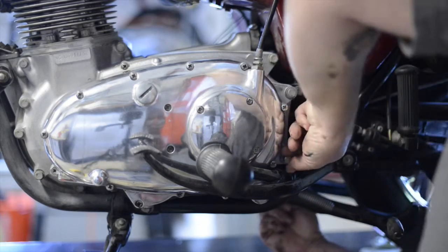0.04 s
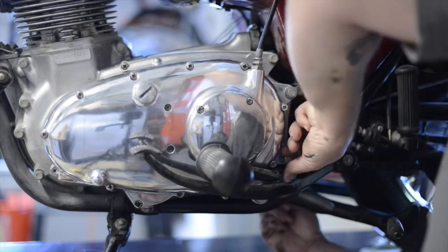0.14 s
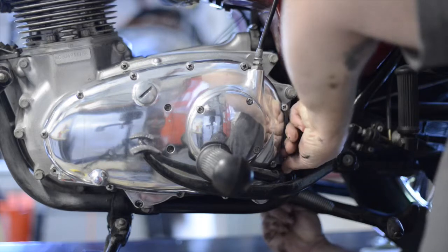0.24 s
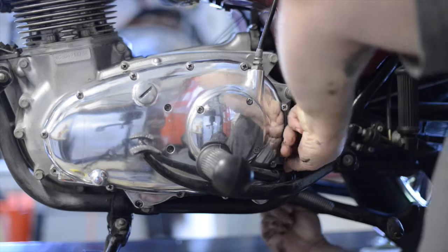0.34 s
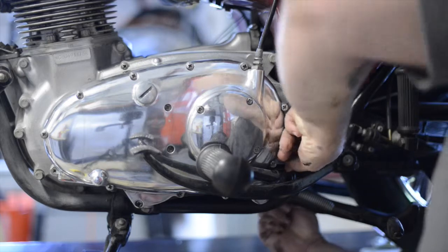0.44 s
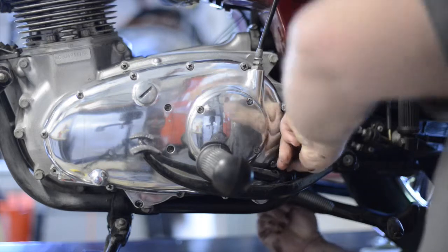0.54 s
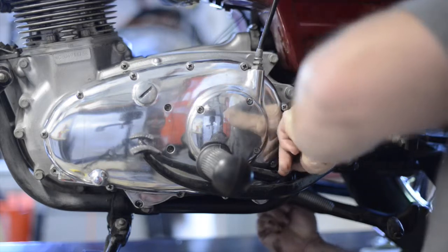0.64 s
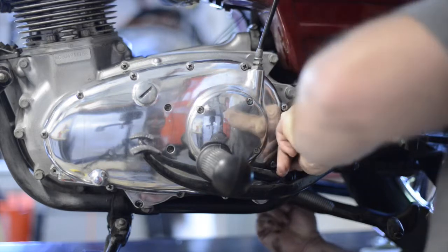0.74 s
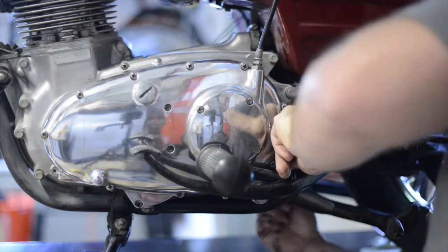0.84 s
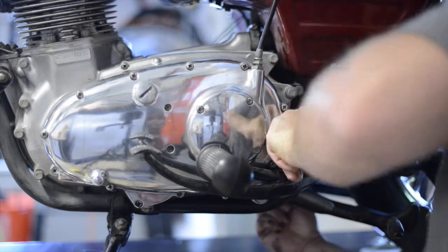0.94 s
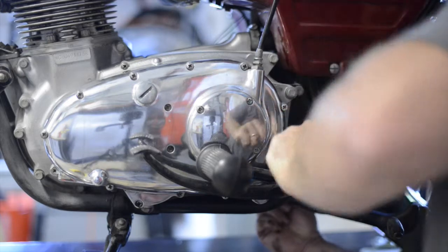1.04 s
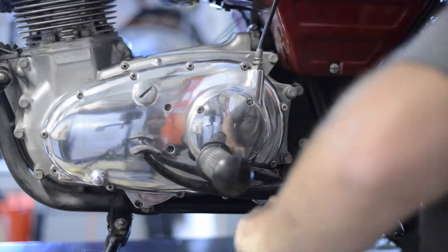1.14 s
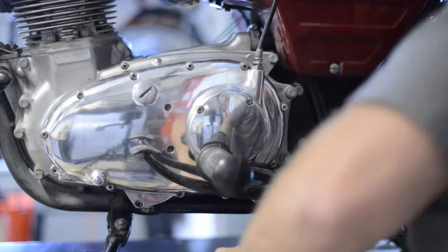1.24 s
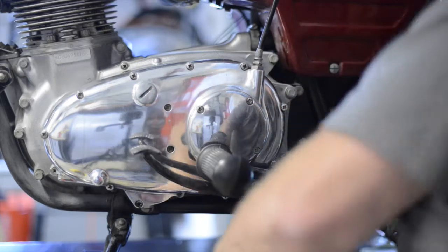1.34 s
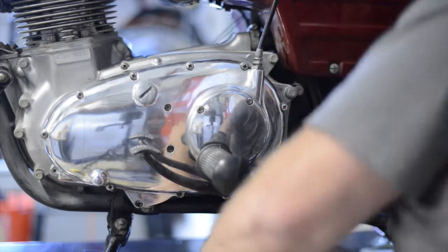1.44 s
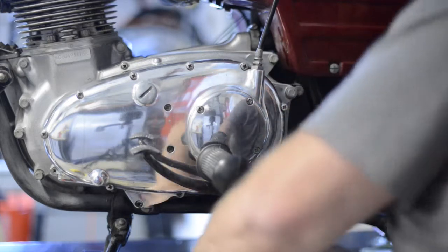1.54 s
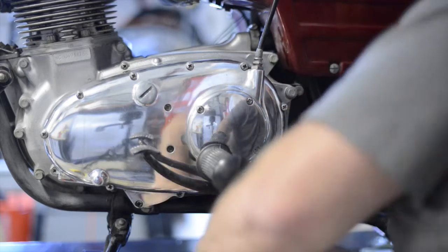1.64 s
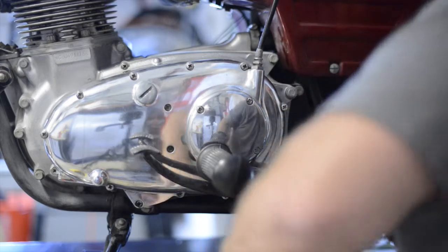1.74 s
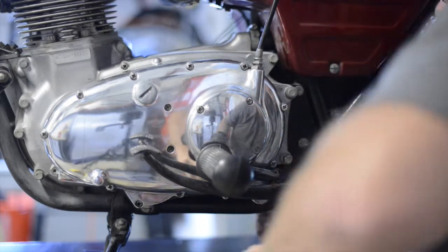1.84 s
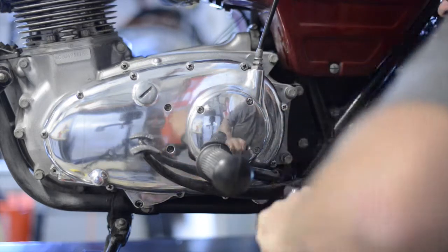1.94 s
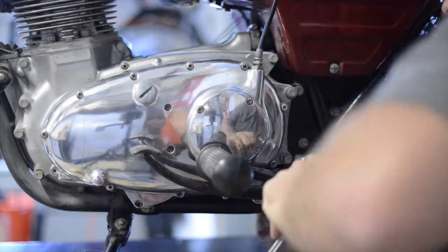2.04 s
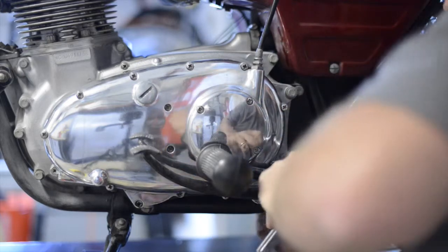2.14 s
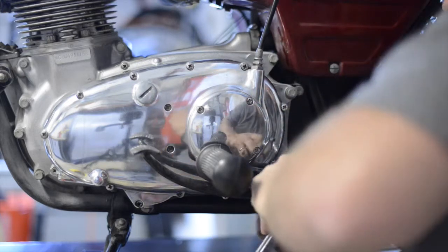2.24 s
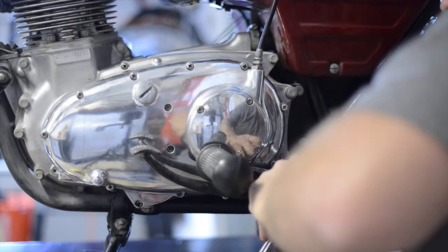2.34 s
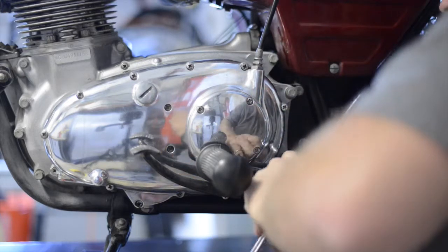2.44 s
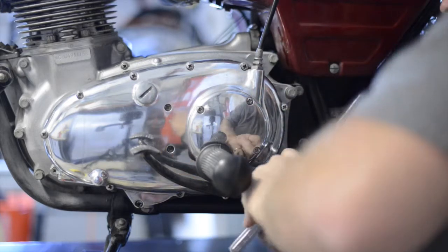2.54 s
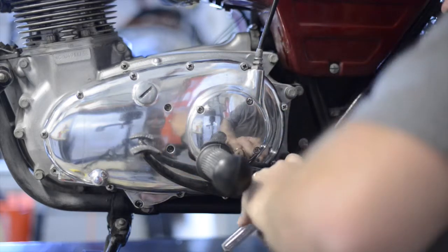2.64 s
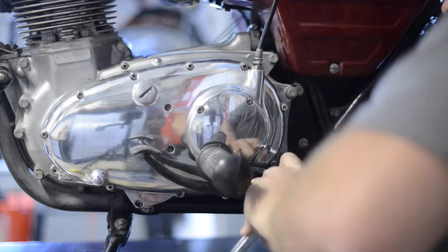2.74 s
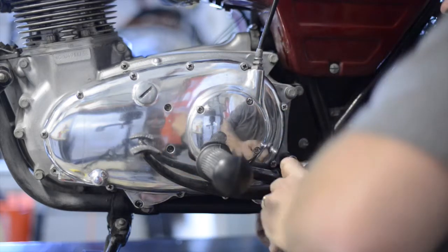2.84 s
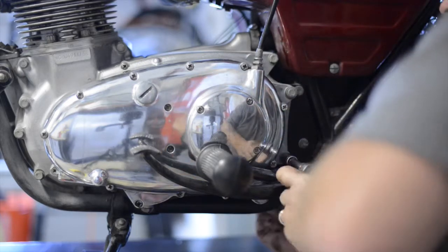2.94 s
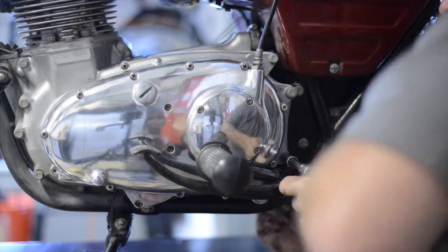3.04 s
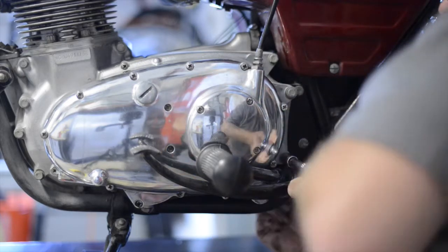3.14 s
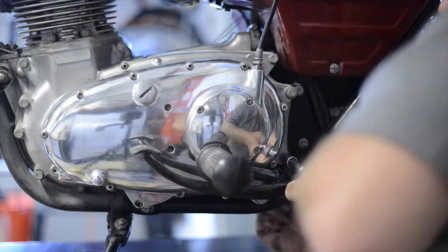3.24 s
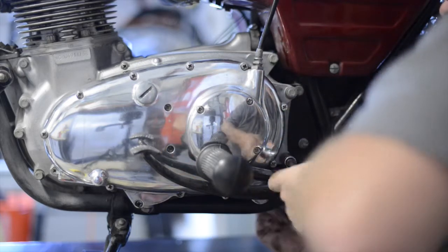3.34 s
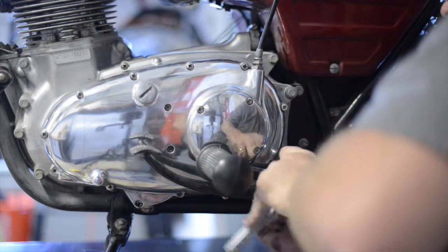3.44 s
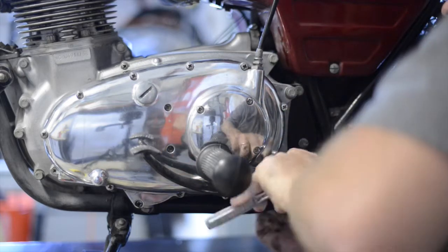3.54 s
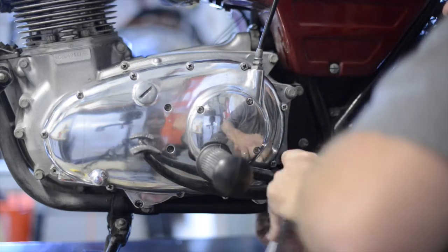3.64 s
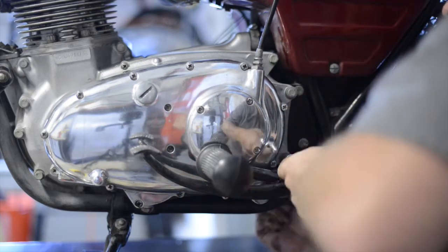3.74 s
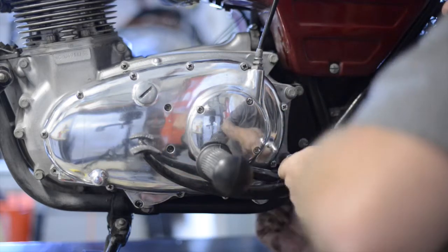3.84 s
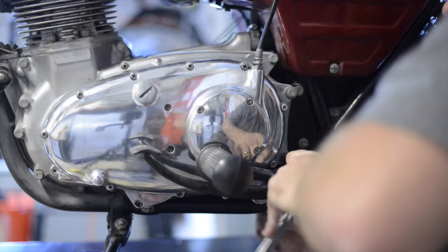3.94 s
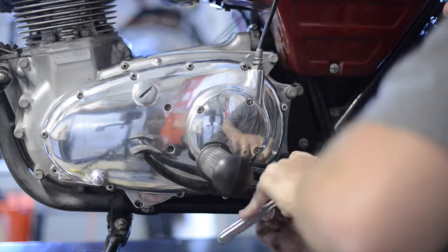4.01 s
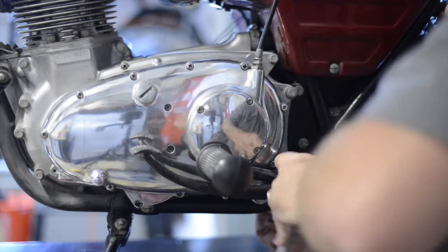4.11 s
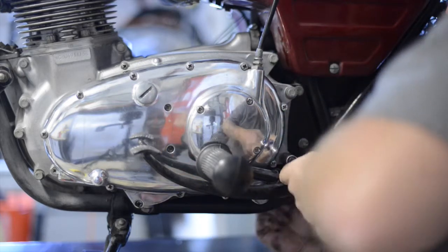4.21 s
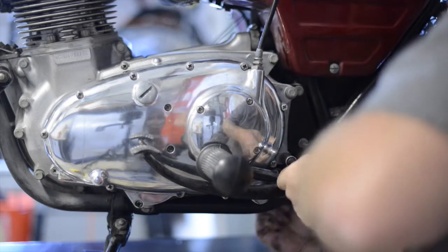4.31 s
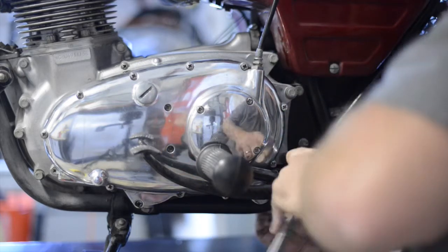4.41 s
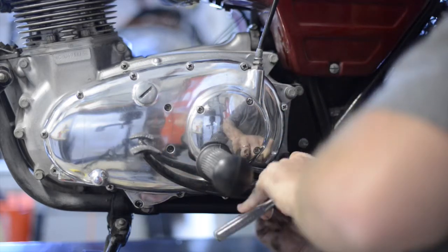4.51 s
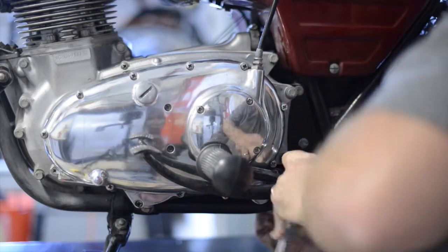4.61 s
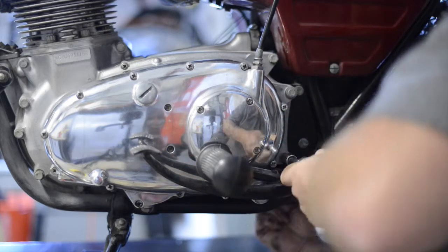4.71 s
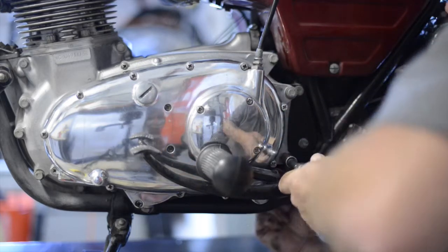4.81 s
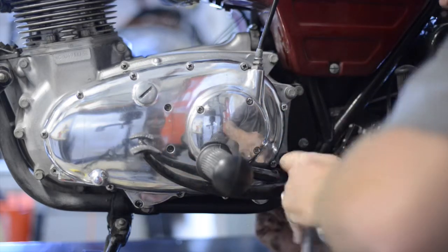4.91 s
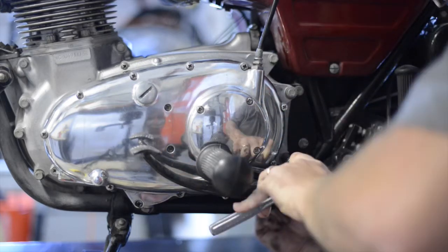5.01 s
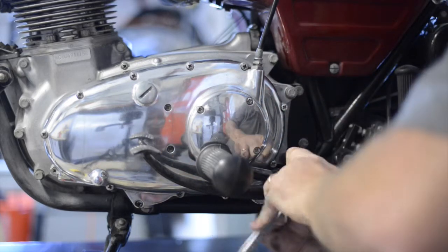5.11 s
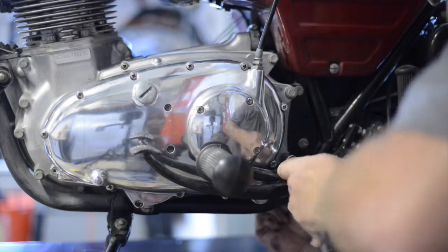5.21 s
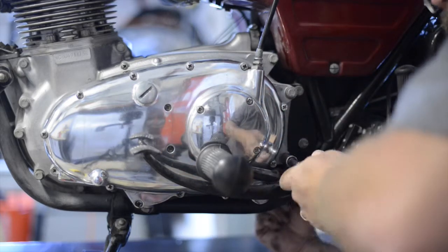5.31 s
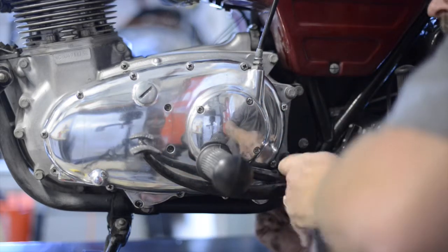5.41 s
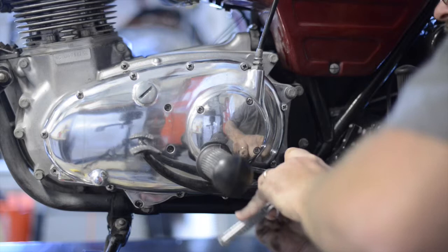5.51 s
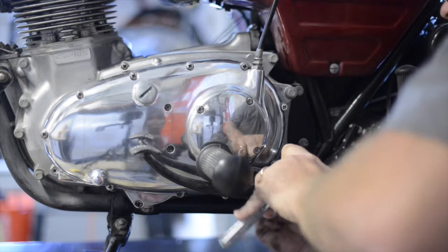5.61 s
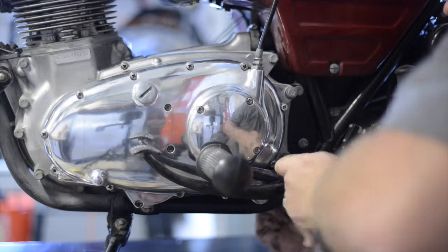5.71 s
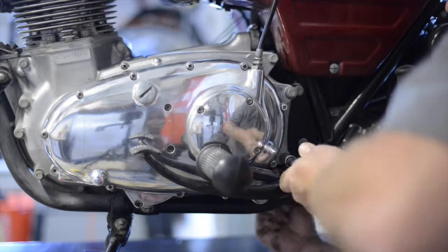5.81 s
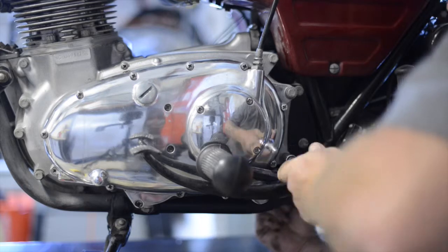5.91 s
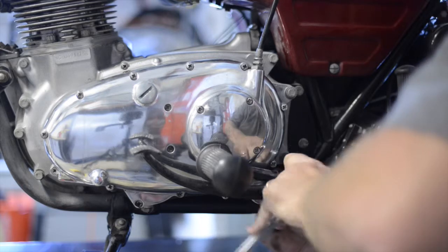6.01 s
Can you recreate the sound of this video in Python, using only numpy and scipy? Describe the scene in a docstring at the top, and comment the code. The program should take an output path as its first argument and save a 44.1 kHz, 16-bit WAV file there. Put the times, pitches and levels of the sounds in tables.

```python
"""A ratchet swings back six times on a motorcycle nut, its pawl snapping over the teeth, close to the microphone.
Place: a hard-walled workshop with a steel lift; ventilation air and a faint motor hum lie behind.
Before that a spanner hisses and squeals off the nut as rubbed noise and a sliding tone, and clangs down on the lift;
a socket is fitted and the nut gives with a clunk. Contacts are bursts of tiny impacts through the spectrum
of the part they shake; struck metal rings in dying sines. Noise echoes carry the tools around the room."""
import sys
import numpy as np
from scipy import signal
from scipy.fft import rfft, irfft
from scipy.io import wavfile

SR = 44100
rng = np.random.default_rng(int(sys.argv[2]) if len(sys.argv) > 2 else 0)


def materialize(psi):
    """Save the field psi as 16-bit PCM at rate SR to the path in sys.argv[1].

    A 1-D psi becomes a single channel; in a 2-D psi each row is a channel.
    """
    bounded = np.clip(np.atleast_2d(psi).T, -1, 1)
    quanta = np.round(bounded * 32767).astype(np.int16)
    wavfile.write(sys.argv[1], SR, quanta)


N = 267246
TIME = np.arange(N) / SR   # s


def amp(db):
    """Decibels to gain."""
    return np.exp(np.asarray(db) * (np.log(10) / 20))


def rms_one(x):
    """Scale to unit rms."""
    return x / np.sqrt(np.mean(x ** 2) + 1e-20)


def at_hz(points, hz):
    """Read a table on a log-frequency axis."""
    freqs, values = np.transpose(points)
    return np.interp(np.log(np.maximum(hz, 1)), np.log(freqs), values)


def in_time(rows):
    """Join the rows of a curve by straight lines."""
    s, *columns = np.transpose(rows)
    return [np.interp(TIME, s, column) for column in columns]


def add(out, s, sound):
    """Mix a sound in at time s."""
    start = max(round(s * SR), 0)
    out[start:start + len(sound)] += sound[:max(N - start, 0)]


def through(x, response):
    """Convolve, keeping the length."""
    return signal.fftconvolve(x, response)[:len(x)]


def colour(x, spectrum, tilt_db=0, size=2048):
    """Causal (minimum-phase) filter of this spectral shape, tilted per octave above the bass; keeps white-noise power."""
    hz = np.fft.rfftfreq(size, 1 / SR)
    octaves = np.log2(np.maximum(hz, 170))
    gain = rms_one(amp(at_hz(spectrum, hz) + tilt_db * octaves))
    # folding the cepstrum onto positive times makes the filter causal
    cepstrum = irfft(np.log(gain))
    cepstrum[1:size // 2] *= 2
    cepstrum[size // 2 + 1:] = 0
    return through(x, irfft(np.exp(rfft(cepstrum))))


def drift(rate):
    """Slow chance of unit rms, with this many random knots per second."""
    knots = rng.standard_normal(int(rate * N / SR) + 2)
    return rms_one(np.interp(TIME * rate, np.arange(len(knots)), knots))


def burst(dying_s, grain_db=0, size=SR // 3):
    """One contact: a dying crowd of tiny impacts, uneven in size where grain_db asks for it."""
    impacts, sizes = rng.standard_normal((2, size))
    fade = np.exp(-TIME[:size] / max(dying_s, 1e-4))
    # the energy depends on the fade alone, not on chance
    return rms_one(impacts * amp(grain_db * sizes) * fade) * np.sqrt(np.mean(fade ** 2))


def ring(modes, uneven_db=0, seconds=1):
    """Struck modes die as sines, with a random sign at every blow and uneven strength where uneven_db asks for it."""
    t = TIME[:int(seconds * SR)]
    chance = rng.standard_normal((len(modes), 2))
    out = np.zeros(len(t))
    for (hz, db, t60), (size, sign) in zip(modes, chance):
        fade = amp(db + uneven_db * size - 60 * t / t60)
        out += np.sign(sign) * fade * np.sin(2 * np.pi * hz * t)
    return out


# spectral shape of the ventilation air: f/Hz, relative level/dB
AIR = [(15, -50), (25, -21.5), (117, -3.5), (149, -12.5), (185, -11.5), (344, -13), (516, -18),
       (591, -15.5), (796, -17), (887, -20), (1020, -19.5), (3720, -25), (8360, -28.5), (16000, -37.5)]
# steady ventilation air, with the dying reverberation of an earlier sound at the start: t/s, level/dB
AIR_LEVEL = [(0, -48.5), (0.6, -51.5), (6.06, -53)]
# partials of the motor hum: f/Hz, relative level/dB
HUM = [(119.6, 2), (77, -5.5)]
# course of the motor hum, before its trim: t/s, level/dB
HUM_LEVEL = [(0.0, -51.5), (0.54, -62.5), (0.84, -53), (1.45, -51.5), (2.34, -68), (6.06, -57.5)]


def background(waver_hz=2.46, motor_db=-1.0):
    """Ventilation air as coloured noise, and a motor hum of sines that waver in pitch."""
    (air_db,), (hum_db,) = in_time(AIR_LEVEL), in_time(HUM_LEVEL)
    air = colour(rng.standard_normal(N), AIR, size=8192)
    hum = np.zeros(N)
    for hz, db in HUM:
        hum += amp(db) * np.sin(2 * np.pi * np.cumsum(hz + waver_hz * drift(8.8)) / SR)
    return amp(air_db) * air + amp(hum_db + motor_db) * rms_one(hum)


# the hand bumps the frame: t/s, level/dB, thud hardness/(dB per octave), dying time/s
BUMPS = [(0.003, -38, 1.5, 0.012), (0.241, -40, -1, 0.0033)]


def hand_contacts(thud_db=-1, clank_db=-16, tick_db=-11):
    """A hand is soft: nearly all thud, little clank or tick."""
    return [(s, db + thud_db, hardness_db, db + clank_db, db + tick_db, dying_s)
            for s, db, hardness_db, dying_s in BUMPS]


# low swaying modes of the frame: f/Hz, relative level/dB, t60/s
SWAY = [(186.5, 4, 0.14), (244, -0.5, 0.08), (380.6, -2, 0.12), (544, -3.5, 0.099)]


def bumps():
    """Soft blows set the frame's low modes swaying."""
    out = np.zeros(N)
    for s, db, *_ in BUMPS:
        add(out, s, amp(db) * ring(SWAY, seconds=.3))
    return out


# tools knock against the machine:
# t/s, frame thud level/dB, thud hardness/(dB per octave), steel clank level/dB, bright tick level/dB, dying time/s
KNOCKS = [(1.556, -39, 5, -52, -49, 0.015), (1.566, -36, 6.5, -30.5, -28, 0.0037),
          (1.595, -34, 7.5, -44, -46, 0.038), (2.310, -46, 7, -28, -18.5, 0.0037),
          (2.336, -50, 2.5, -25.5, -27, 0.0028), (2.396, -44.5, 5.5, -40, -58, 0.0054),
          (2.553, -42, 5.5, -23, -28, 0.0043), (2.872, -69, 3, -54, -34, 0.0031),
          (3.214, -31.5, -3, -35, -45, 0.0082), (3.243, -26, -1.7, -18.5, -28.5, 0.0059),
          (5.016, -44, 6.5, -27, -47.5, 0.036)]
# spectral shapes of the frame, the steel tool and its hard edges: f/Hz, relative level/dB
FRAME = [(50, -28), (120, -20), (185, -1), (260, -6.5), (340, 3), (480, 2), (650, -1.5), (850, -4),
         (1300, -9.5), (3000, -22), (9000, -72)]
STEEL = [(150, -45), (600, -11), (1050, -5), (1400, -6), (1750, -4), (2200, -2), (2900, 1), (3800, -1.5),
         (4700, -6.5), (6000, -3.5), (9000, -61), (15000, -71)]
TICK = [(500, -30), (2800, -9), (4200, 7), (5600, 1.5), (7000, 1.5), (8100, 4), (8900, -1.5), (10100, -0.5),
        (12500, -12), (15500, -11)]
# after each contact the frame rocks back with a second thud; both thuds die more slowly by the added time
SETTLE_S, SETTLE_DB, FRAME_DYING_S = .015, -0.5, .013


def knocks():
    """Each contact shakes the frame, the steel tool and its hard edges in its own proportion."""
    out, steel, tick = np.zeros((3, N))
    contacts = [*KNOCKS, *slack_contacts(), *take_up_contacts(), *hand_contacts()]
    for s, thud_db, hardness_db, clank_db, tick_db, dying_s in contacts:
        for late_s, loss_db in ((0, 0), (SETTLE_S, SETTLE_DB)):
            thud = colour(burst(dying_s + FRAME_DYING_S), FRAME, hardness_db)
            add(out, s + late_s, amp(thud_db + loss_db) * thud)
        add(steel, s, amp(clank_db) * burst(dying_s, grain_db=0.5))
        add(tick, s, amp(tick_db) * burst(dying_s, grain_db=6.5))
    return out + colour(steel, STEEL) + colour(tick, TICK)


# workshop reverberation: f/Hz, t60/s
ROOM_T60 = [(150, 0.55), (500, 0.92), (1400, 0.96), (3500, 0.71), (6500, 0.598), (10000, .5), (15000, 0.27)]


def room_response(early_db=-5, early_s=0.0071, late_db=-2.5, build_s=0.0052):
    """Quick scatter off the machine and lift, then a diffuse noise tail whose high treble dies first."""
    t = TIME[:SR]
    hz = np.fft.rfftfreq(SR, 1 / SR)
    white = rfft(rng.standard_normal(SR))
    centres = np.geomspace(100, 16000, 16)   # overlapping bands, Hz
    tail = 0
    for centre, share in zip(centres, np.eye(len(centres))):
        band = irfft(white * at_hz(np.column_stack([centres, share]), hz), SR)
        tail = tail + band * amp(-60 * t / at_hz(ROOM_T60, centre))
    tail = tail * (1 - np.exp(-t / build_s))
    sparse = rng.standard_normal(SR) * (rng.random(SR) < .1)
    early = sparse * (t > .002) * np.exp(-t / early_s)
    return (amp(early_db) * rms_one(early) + amp(late_db) * rms_one(tail)) / np.sqrt(SR)


def workshop(x, movement_per_s=9, count=3):
    """Arm and tool keep moving, so the sound leaves by changing paths at constant power."""
    paths = np.array([drift(movement_per_s) for _ in range(count)])
    paths /= np.sqrt(np.sum(paths ** 2, axis=0))
    return sum(through(x * share, room_response()) for share in paths)


# spanner sliding off the nut: t/s, level/dB before the rub trim, thin squeal f/Hz
SLIDE = [(0.35, -102, 7500), (0.5, -53, 8300), (0.7, -48.5, 9500), (0.81, -57.5, 9300), (0.93, -47, 11000),
         (1.02, -52.5, 9900), (1.1, -49, 9760), (1.18, -74, 9100), (1.28, -72.5, 8500)]
# spectral shape of the rubbing steel: f/Hz, relative level/dB
RUB = [(500, 3.5), (1400, -7), (2300, 4), (3400, -5), (4500, 4), (5300, -7.5), (6200, 1.5), (7000, -7),
       (7900, -1.5), (9000, -13), (14000, -16)]
# a tool knocks the nut, the spanner coming off or the socket as the nut gives: t/s, level/dB, dying time/s
SLIPS = [(0.554, -27.5, 0.014), (0.835, -36.5, 0.0075), (3.242, -24.5, 0.011)]
# spectral shape of the nut and its stud: f/Hz, relative level/dB
NUT = [(200, -10), (700, -9.5), (1050, -15), (1400, 0), (1750, -10.5), (2250, 2), (2550, -1.5),
       (3300, -9.5), (3850, -4.5), (4500, -19), (8200, -21), (12000, -38)]
# ringing of the nut on its stud: f/Hz, relative level/dB, t60/s
NUT_RING = [(2285, -14, 0.255), (2500, -11, 0.14), (2760, -18, 0.21), (3860, -22, .12)]


def slide(rub_db=-2, squeal_db=-9, squeal_width_hz=220):
    """Steel rubs on steel: grainy hiss, a ragged squeal of gliding pitch, and knocks that ring the nut."""
    db, hz = in_time(SLIDE)
    force, ringing = np.zeros((2, N))
    for s, slip_db, dying_s in SLIPS:
        add(force, s, amp(slip_db) * burst(dying_s, grain_db=2.0))
        add(ringing, s, amp(slip_db - 2) * ring(NUT_RING, seconds=.3))
    grains = rng.standard_normal(N) * amp(2.02 * drift(150))
    hiss = colour(rms_one(grains), RUB)
    squeal = np.sin(2 * np.pi * np.cumsum(hz + squeal_width_hz * drift(900)) / SR)
    rub = amp(db + rub_db) * (hiss + amp(squeal_db) * squeal)
    return colour(force, NUT) + ringing + rub


# spanner landing and rattling on the lift: t/s, level/dB, dying time/s
DROP = [(1.664, -8.5, 0.0089), (1.671, -11, 0.011), (1.698, -21.5, 0.057)]
# spectral shape of the steel lift: f/Hz, relative level/dB
LIFT = [(80, -20), (250, -13.5), (550, -13.5), (900, 0), (1150, -6.5), (1600, -8.5), (2700, 1),
        (4300, -1.5), (5200, -6), (6200, 1.5), (7700, -9.5), (9200, -8.5), (11500, -23), (15000, -25)]
# ringing of the dropped spanner, with close pairs that beat: f/Hz, relative level/dB, t60/s
SPANNER = [(886, -13, 0.75), (930, -12, 0.5), (1112, -12, 0.4), (1222, -11, 0.5), (2670, -14, 0.7),
           (3069, -14, 0.6), (3395, -10, 0.5), (3811, -20, .8), (4286, -7, 0.36), (4490, -11, 0.5),
           (5080, -14, .45), (5173, -6, .24), (5669, -10.5, 0.7), (5981, -13, 0.82), (6368, -17, .5),
           (6401, -14, .58), (6835, -7, 0.26), (7290, -6, 0.22), (8150, -8, 0.21), (9660, -15, 0.29),
           (10402, -17.5, 1.64), (10405, -8, 0.16), (13505, 0, .09), (15155, -9, 0.44), (15652, -11, 0.35)]


def dropped_spanner(ring_db=-18):
    """The steel deck crashes under the spanner, which rings on from the first landing: (crash, ring)."""
    force, ringing = np.zeros((2, N))
    for s, db, dying_s in DROP:
        add(force, s, amp(db) * burst(dying_s, grain_db=-5.5))
    add(ringing, DROP[0][0], amp(ring_db) * ring(SPANNER))
    return colour(force, LIFT), ringing


# the socket rings when it is free on the nut: t/s, level/dB
SOCKET_PINGS = [(2.872, -42), (5.575, -15.5)]
# ringing of the socket: f/Hz, relative level/dB, t60/s
SOCKET = [(8130, -2, .04), (8220, -0.5, 0.062), (8400, -1.5, .04)]


def socket_pings():
    """The free socket rings briefly in close high modes."""
    out = np.zeros(N)
    for s, db in SOCKET_PINGS:
        add(out, s, amp(db) * ring(SOCKET, seconds=.2))
    return out


# back swings of the hand: t/s of the first tooth, teeth, top speed/(teeth per s), fastest tooth counted from 0,
# slowing/(per tooth squared)
SWINGS = [(3.4405, 11, 88, 4.2, .034), (3.9548, 9, 81.2, 2.7, .0457), (4.4557, 8, 82.3, 2.3, .0241),
          (4.9844, 9, 103.1, 2.4, .0261), (5.5073, 7, 64.9, 0, .0206), (6.008, 6, 89, 2, .005)]
# the grip on each swing sets how the tool rings: snap level/dB, slack knock level/dB, first pawl lift level/dB,
# handle ring level/dB relative to the snap, brightness/(dB per octave), resonance f/Hz, resonance level/dB
GRIPS = [(-10.5, -55, -45, -17.5, -0.8, 5630, -24), (-11, -38, -27.5, -20.5, -0.7, 3700, -0.5),
         (-11, -32.5, -29.5, -15, -1, 3100, -10), (-11, -46, -38, -11, 0.5, 5600, -9),
         (-11.5, -39, -19, -16.5, -0.96, 5300, 2), (-10.5, -42, -20.5, -13, -1, 4870, 8.5)]
# before the first tooth the slack closes, then the pawl lifts and drops back
SLACK_LEAD_S, LIFT_LEAD_S = .036, .0185


def slack_contacts(thud_db=-17, hardness_db=3, tick_db=-1, dying_s=0.005):
    """Before each swing the socket rocks across its play on the nut."""
    return [(s - SLACK_LEAD_S, db + thud_db, hardness_db, db, db + tick_db, dying_s)
            for (s, *_), (_, db, *_) in zip(SWINGS, GRIPS)]


def tooth_times(start_s, teeth, top_speed, fastest, slowing):
    """The gaps between teeth grow on either side of the fastest one, as the hand speeds up and slows."""
    gaps = (1 + slowing * (np.arange(round(teeth) - 1) - fastest) ** 2) / top_speed
    return start_s + np.append(0, np.cumsum(gaps))


# spectral shape of the ratchet head: f/Hz, relative level/dB
RATCHET = [(150, -32.5), (800, -14), (1800, -16.5), (2500, -10.5), (3100, -5.5), (4300, -4.5), (5000, -4.5),
           (6200, 0), (7500, -3.5), (8500, -3), (10000, -9.5), (12500, -12), (15500, -9.5)]


def pawl_snap(tilt_db, peak_hz, peak_db, snap_s=.0012, rise_s=0.00025, low_hz=2300, high_hz=13000,
              drag_db=-17, drag_s=0.015, sharpness=11.5, size=2048):
    """A short bright snap and a fuller trailing rasp through the ratchet head, always with the same energy."""
    hit = burst(snap_s, grain_db=1.5, size=size)
    energy = np.sqrt(np.mean(hit ** 2))
    hit = hit * (1 - np.exp(-TIME[:size] / rise_s))   # the pawl slides off the crest before it lands
    band = signal.butter(1, [low_hz, high_hz], "band", fs=SR, output="sos")
    hit = signal.sosfilt(band, hit)
    rasp = amp(drag_db) * burst(drag_s, grain_db=1.5, size=size)
    force = energy * rms_one(hit) + rasp
    resonance = signal.lfilter(*signal.iirpeak(peak_hz, sharpness, fs=SR), force)
    return energy * rms_one(colour(force + amp(peak_db) * resonance, RATCHET, tilt_db))


# ringing of the ratchet handle: f/Hz, relative level/dB, t60/s
HANDLE = [(970, -26, 0.0116), (1746, -16.5, 0.04), (2020, -11, 0.015), (3046, -18.5, 0.047),
          (4080, -4.5, 0.021), (4880, 2, 0.018), (5880, -8, 0.066), (6340, -13, 0.025), (10520, -11, .04)]
# the snaps weaken as the hand comes to rest; no two teeth are alike
SWING_FADE_DB, TOOTH_SPREAD_DB = -4, 1.6


def ratchet(fall_s=.0004, rebound_s=.0062, rebound_db=-12, snap_db=0.92, fade_power=3.7):
    """The pawl lifts once, then falls into each tooth gap and rebounds; the handle rings along."""
    out = np.zeros(N)
    for swing, (level_db, _, lift_db, handle_db, *timbre) in zip(SWINGS, GRIPS):
        times = tooth_times(*swing)
        levels = level_db + SWING_FADE_DB * np.linspace(0, 1, len(times)) ** fade_power
        for s, db in [(times[0] - LIFT_LEAD_S, lift_db), *zip(times, levels)]:
            db = db + TOOTH_SPREAD_DB * rng.standard_normal()
            add(out, s + fall_s, amp(db + snap_db) * pawl_snap(*timbre))
            add(out, s + rebound_s * rng.uniform(.8, 1.2), amp(db + rebound_db) * pawl_snap(*timbre))
            add(out, s + fall_s, amp(db + handle_db) * ring(HANDLE, uneven_db=4.0, seconds=.1))
    return out


# the pawl takes up the load as a swing turns round: t/s, level/dB, bright tick level/dB
TAKE_UPS = [(4.170, -46, -50.5), (4.660, -39, -32.5), (5.721, -42.5, -28)]


def take_up_contacts(thud_db=-5, hardness_db=5.0, clank_db=7, dying_s=0.0065):
    """After a swing the socket is pressed back against the nut."""
    return [(s, db + thud_db, hardness_db, db + clank_db, tick_db, dying_s) for s, db, tick_db in TAKE_UPS]


# the loaded tool and nut ring together: f/Hz, relative level/dB, t60/s
LOADED = [(399, -7.5, 0.21), (834, -10, 0.14), (1330, -3, 0.071), (1690, 8, 0.02), (1970, 1.5, 0.051)]


def loaded_ring():
    """Taking up the load joins tool and nut, which ring in lower modes."""
    out = np.zeros(N)
    for s, db, _ in TAKE_UPS:
        add(out, s, amp(db) * ring(LOADED, uneven_db=2.5, seconds=.2))
    return out


def scene(contact_db=-2.5, ratchet_wet_db=0.0, knock_wet_db=0.5, crash_wet_db=-0.5, ring_wet_db=-7):
    """Tools close to the microphone, the workshop around them."""
    clicks = ratchet() + loaded_ring()
    contacts = knocks() + socket_pings() + bumps() + slide()
    crash, ringing = dropped_spanner()
    sent = amp(ratchet_wet_db) * clicks + amp(knock_wet_db) * contacts
    sent = sent + amp(crash_wet_db) * crash + amp(ring_wet_db) * ringing
    direct = clicks + amp(contact_db) * contacts + crash + ringing
    return (direct + workshop(sent) + background())[None]


CUTOFF_HZ = 15850


def record(dry):
    """The microphone signal has its highest peaks rounded and its top cut steeply."""
    rounded = dry / (1 + dry ** 6) ** (1 / 6)
    lowpass = signal.ellip(12, .1, 80, CUTOFF_HZ, fs=SR, output="sos")
    return signal.sosfilt(lowpass, rounded)


dry = scene()
out = record(dry)
materialize(out)
```